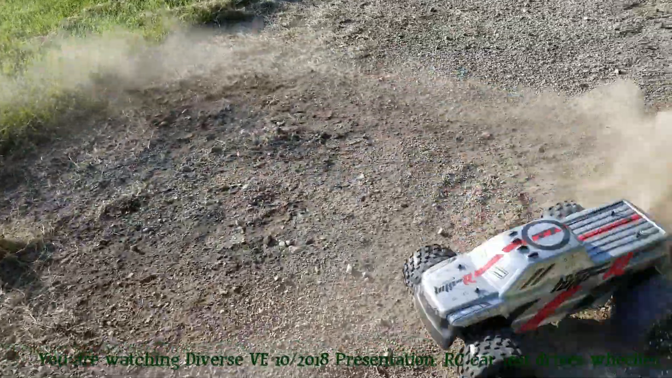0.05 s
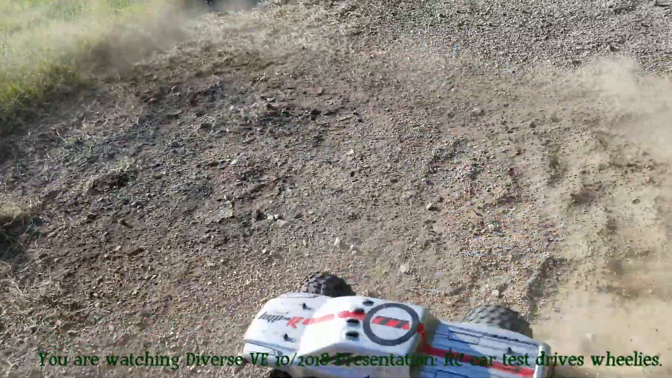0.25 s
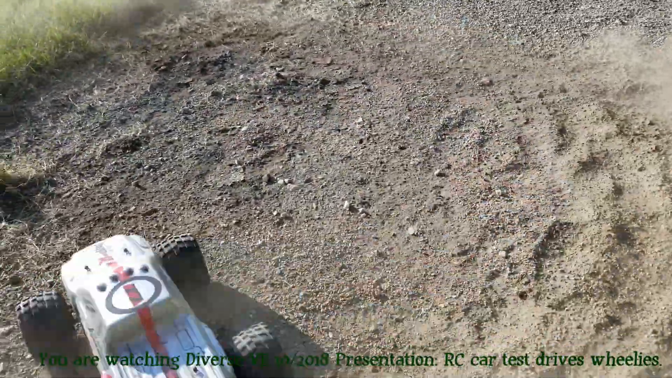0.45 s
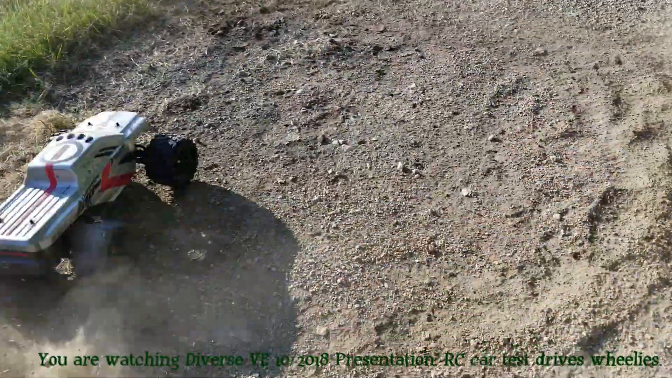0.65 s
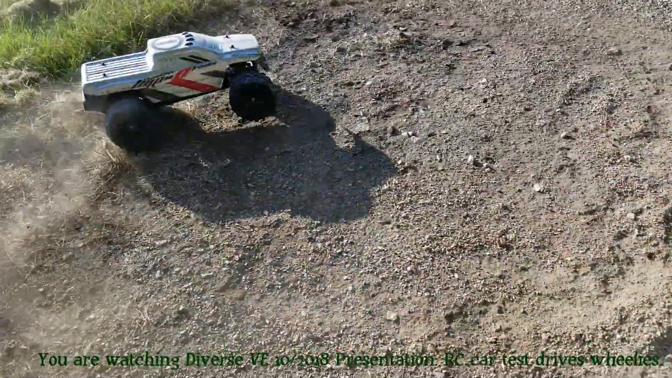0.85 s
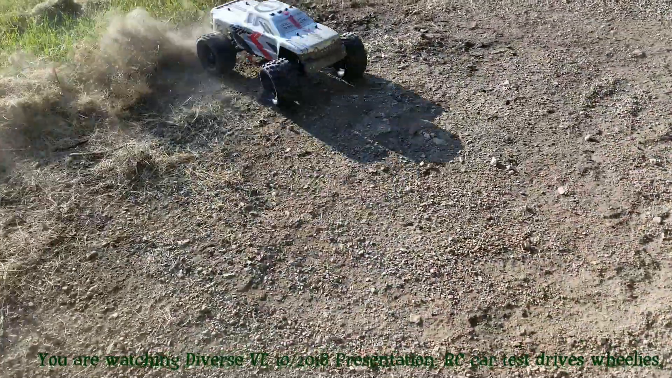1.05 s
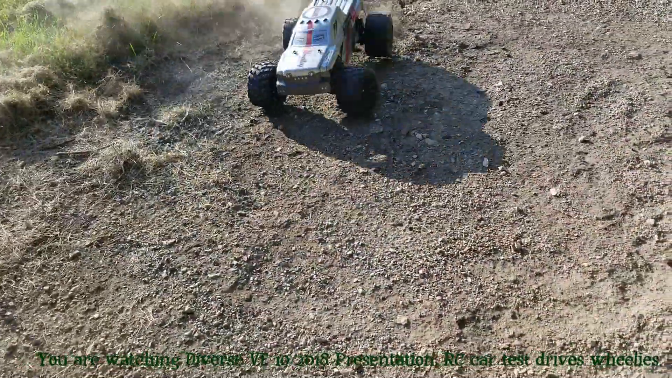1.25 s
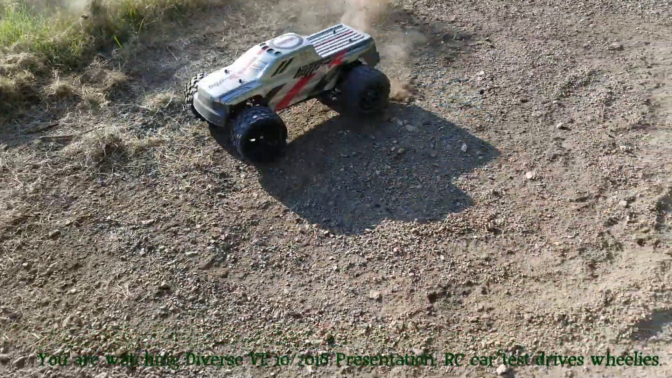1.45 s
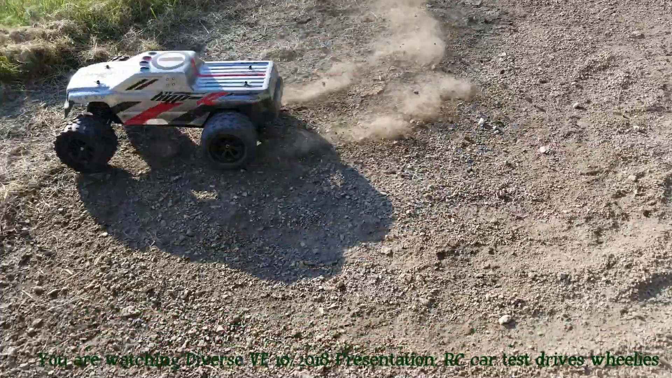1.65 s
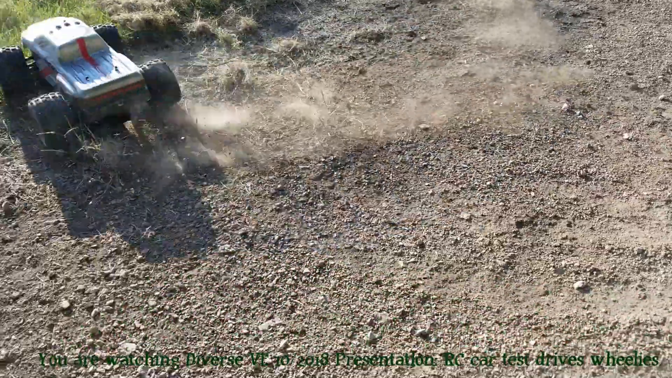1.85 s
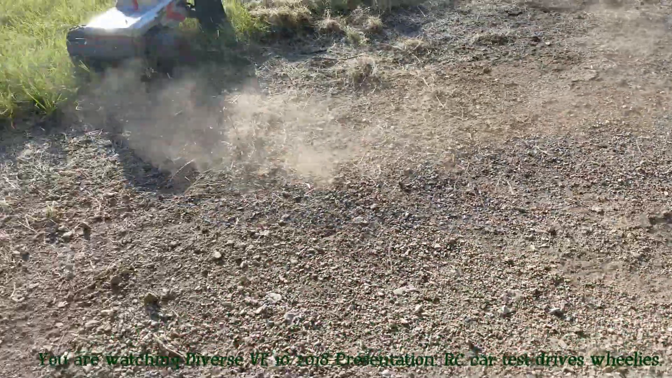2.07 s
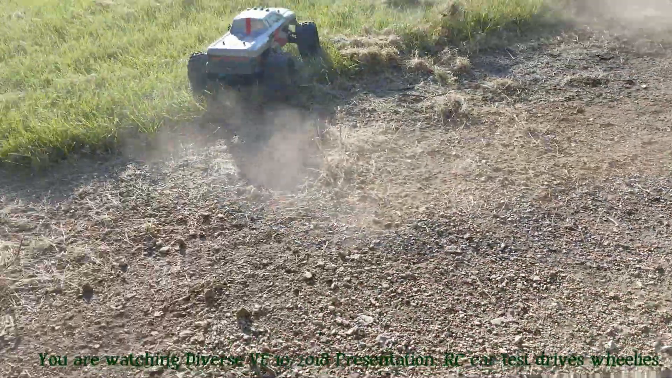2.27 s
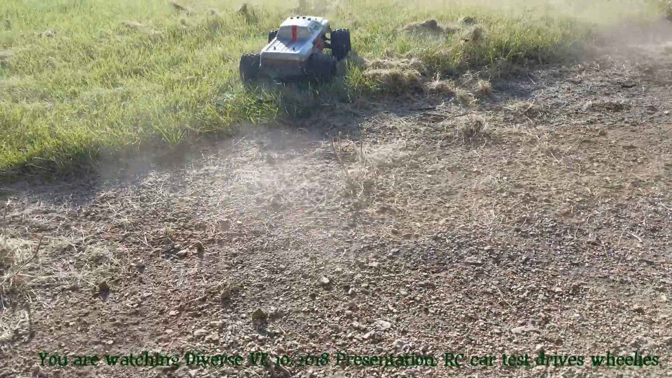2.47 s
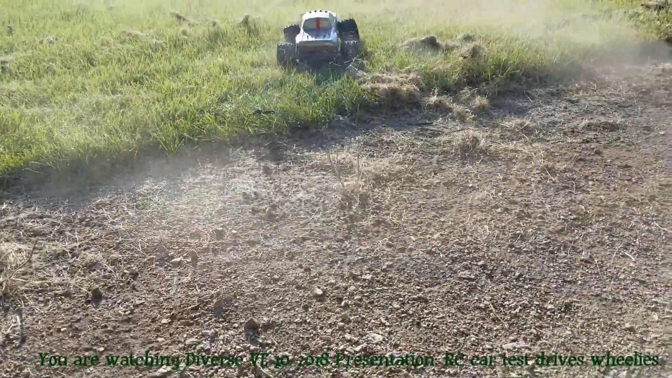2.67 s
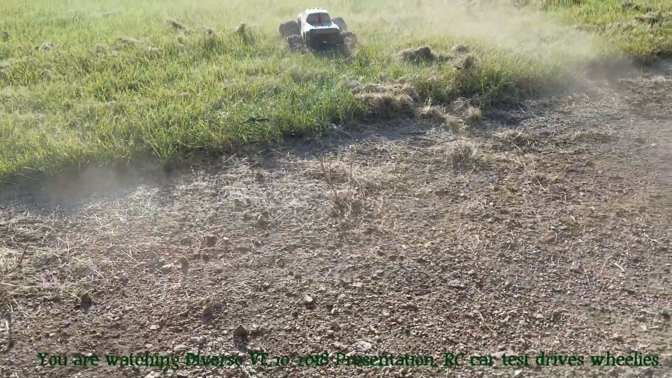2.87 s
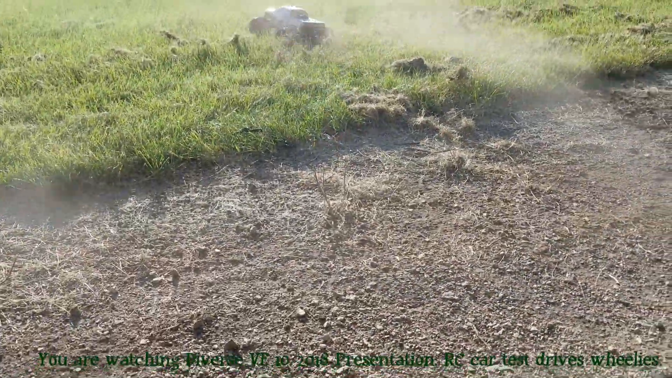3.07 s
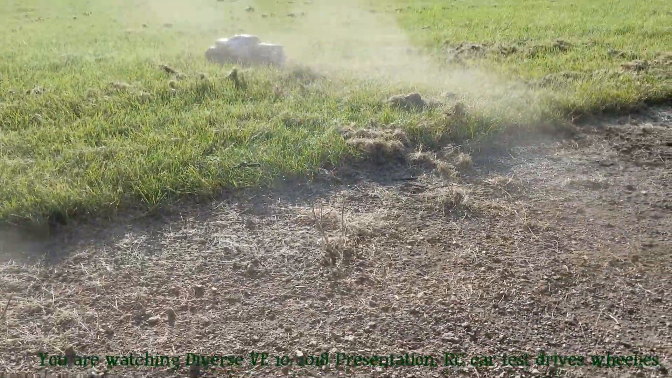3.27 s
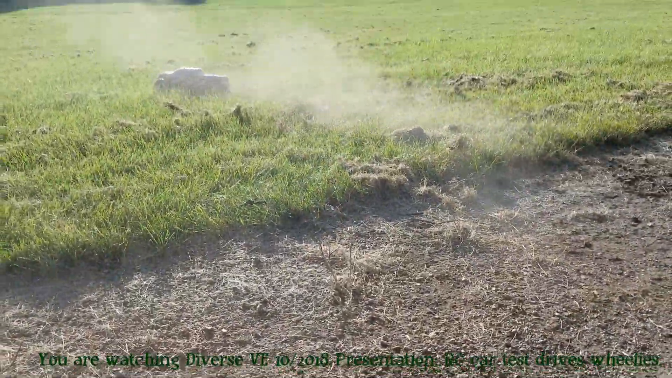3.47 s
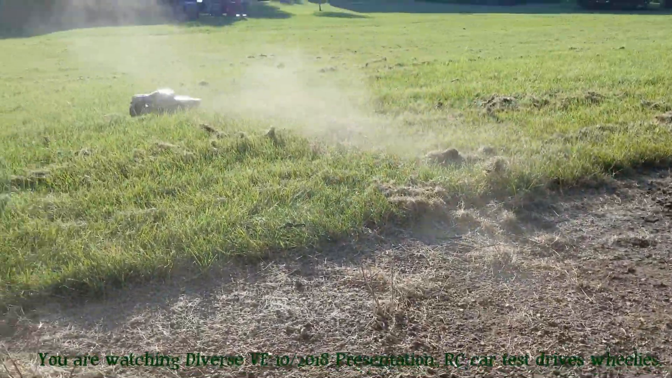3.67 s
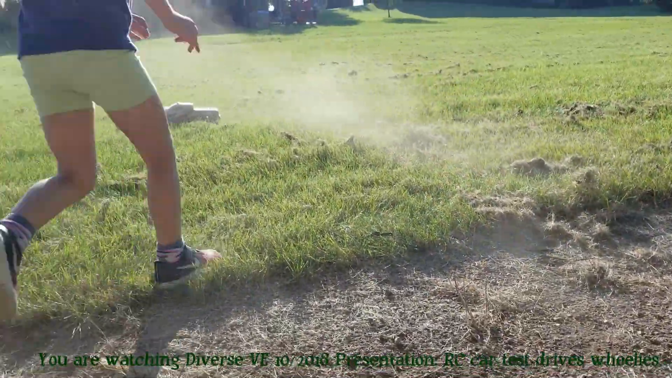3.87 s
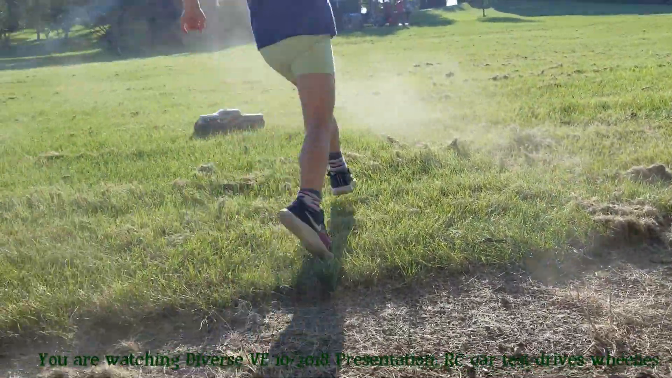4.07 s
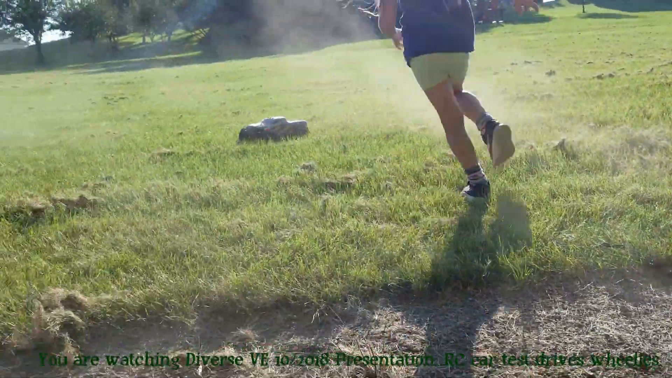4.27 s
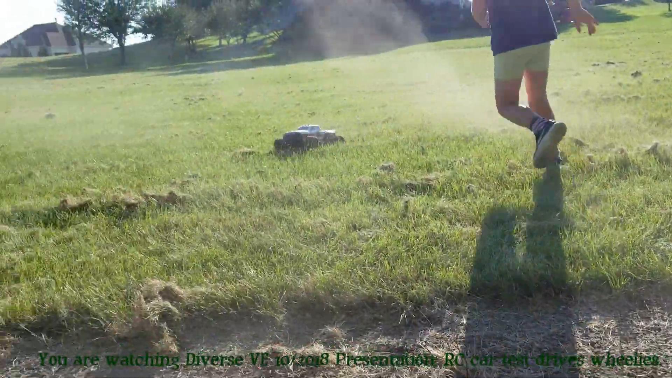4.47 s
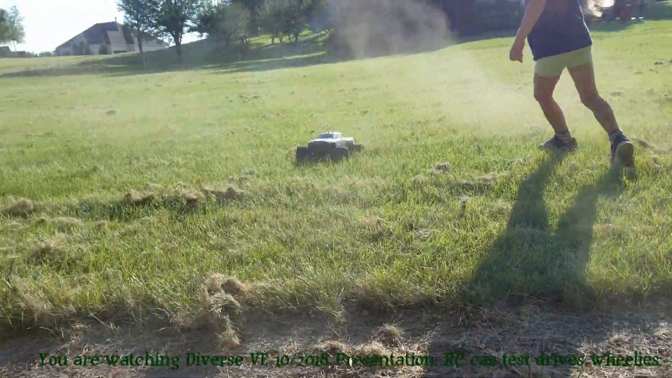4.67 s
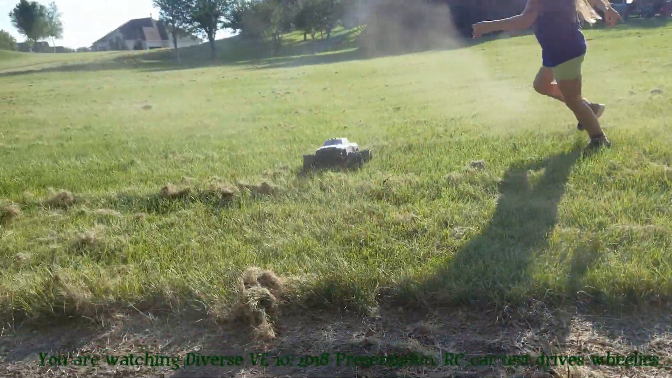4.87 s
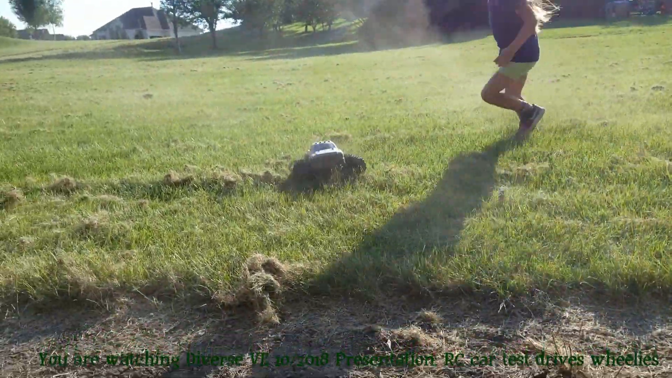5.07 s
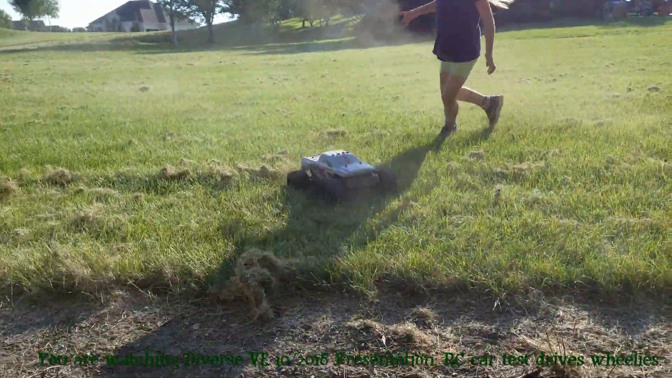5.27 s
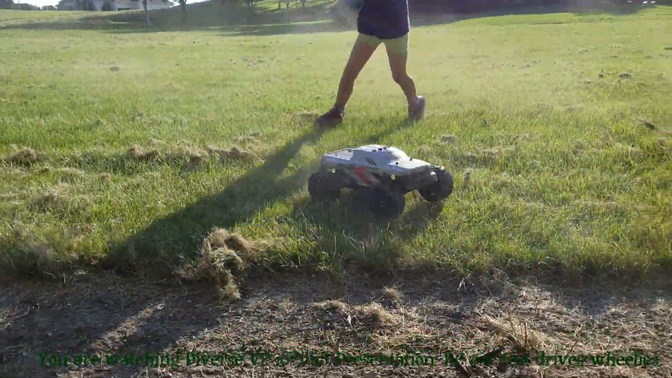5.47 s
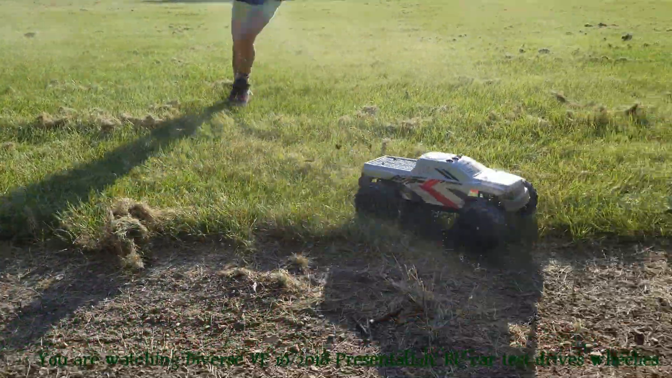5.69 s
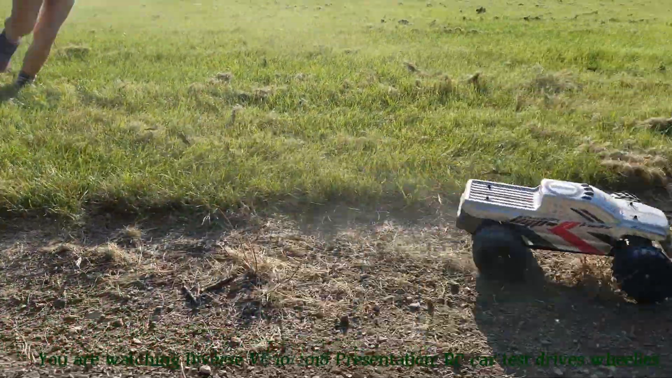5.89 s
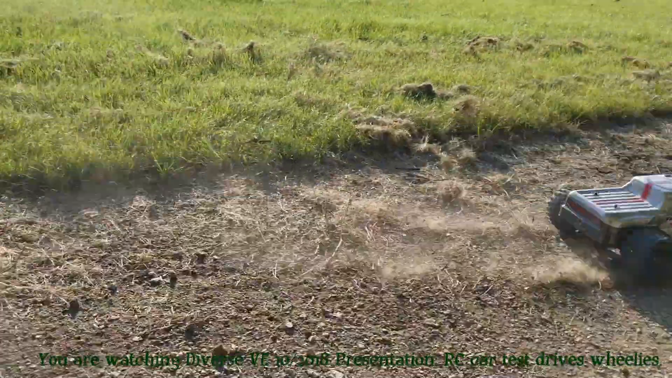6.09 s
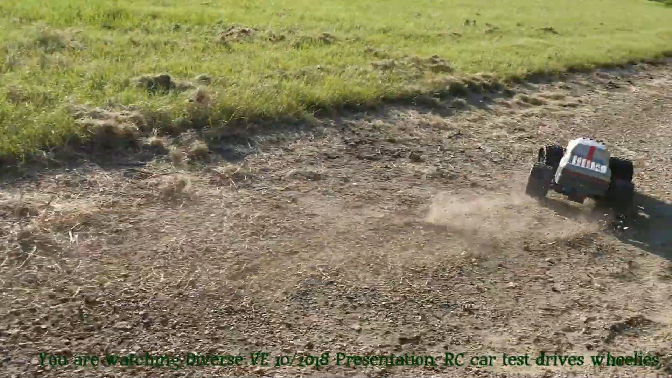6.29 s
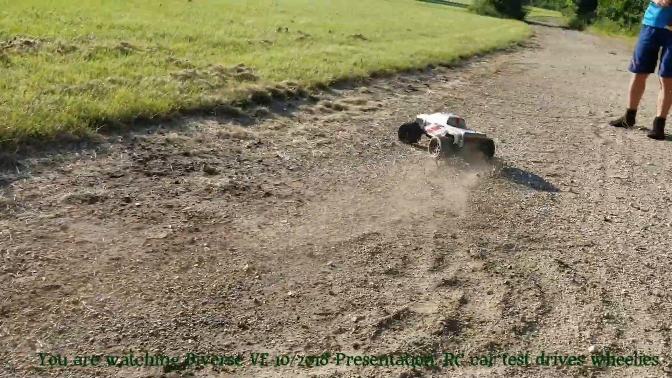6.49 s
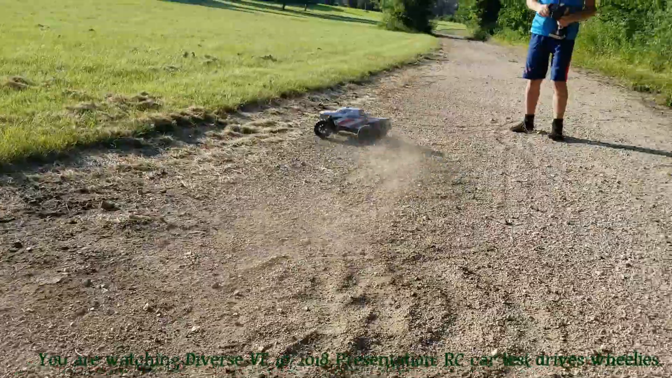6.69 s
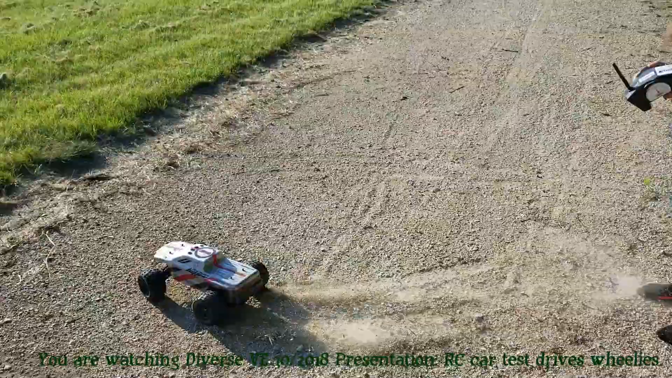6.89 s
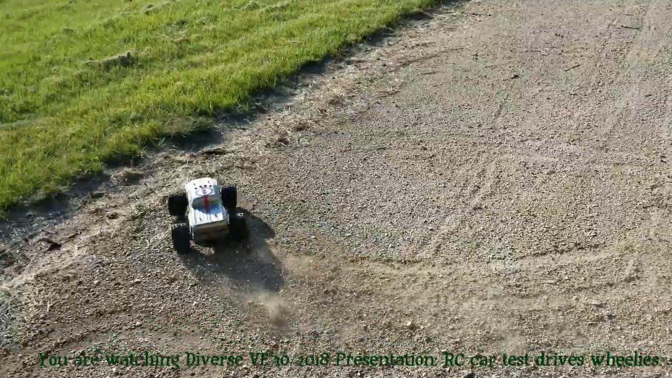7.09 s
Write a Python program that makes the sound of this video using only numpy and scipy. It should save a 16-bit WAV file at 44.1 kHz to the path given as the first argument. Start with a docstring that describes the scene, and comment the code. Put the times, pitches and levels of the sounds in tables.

```python
"""Electric toy truck on gravel and grass

A small truck runs on a gravel track, off over a lawn and back: its gear tones follow a surging motor.
Random blows ring its plastic shell; noise and decaying grains make the tyre crunch, grit and flung stones.
A far engine drones on two wavering sines, air hisses and a runner's feet swish through the grass.
Two microphone ports colour everything differently in level, phase and coherence."""
import sys
import numpy as np
from scipy.fft import rfft, irfft, next_fast_len
from scipy.io import wavfile
from scipy.ndimage import map_coordinates

SR = 44100
rng = np.random.default_rng(int(sys.argv[2]) if len(sys.argv) > 2 else 0)


def put_to_file(sound):
    """Save the sound as 16-bit audio at rate SR, in the file named by the first command-line argument."""
    columns = np.atleast_2d(sound).T  # one column per channel
    safe = np.clip(columns, -1, 1)
    whole_steps = np.round(safe * 32767)
    wavfile.write(sys.argv[1], SR, whole_steps.astype(np.int16))


N = 314874
TOP_HZ = 15950  # band limit

# Ring of the plastic shell: (frequency [Hz], level [dB])
SHELL_SPECTRUM = [(30, -22), (220, -8), (350, -2.5), (455, 5), (590, -2.5), (790, -12), (920, -15),
                  (1500, -18.5), (4000, -75)]
# Tyre crunch: (frequency [Hz], level [dB])
CRUNCH_SPECTRUM = [(300, -7), (850, -1.5), (1500, -3), (2350, 5), (2900, -4), (4100, -1), (5300, 0),
                   (6200, -30), (12000, -9.5)]
# Thrown grit: (frequency [Hz], level [dB])
GRIT_SPECTRUM = [(2000, -19), (3500, -6.5), (5300, -8.5), (7000, -10.5), (10000, 1.5), (11400, -2),
                 (12700, 8), (14000, -9), (16000, -9)]


def amp(db):
    """Decibels to linear amplitude."""
    return 10 ** (np.asarray(db) / 20)


def unit(x):
    """Scale to an RMS of 1 over all rows."""
    return x / np.sqrt(np.mean(x ** 2) + 1e-20)


def along(points, hz):
    """Each column of (Hz, ..) rows, interpolated on a log-frequency axis."""
    f, *cols = np.transpose(points)
    return [np.interp(np.log(hz + 1), np.log(f + 1), c) for c in cols]


def curves(rows):
    """Each column of (s, ..) rows, interpolated to one value per sample."""
    s, *cols = np.transpose(rows)
    return [np.interp(np.arange(N) / SR, s, c) for c in cols]


def wobble(knots_per_s):
    """A smooth random curve through Gaussian knots."""
    knots = rng.standard_normal(int(N * knots_per_s / SR) + 4)
    return map_coordinates(knots, [np.arange(N) * knots_per_s / SR])


def noise():
    """White noise: rows are direct and scattered sound."""
    return rng.standard_normal((2, N))


def swell(centre_s, half_s):
    """A Gaussian rise and fall."""
    return np.exp(-((np.arange(N) / SR - centre_s) / half_s) ** 2)


def coloured(x, spectrum):
    """Minimum-phase filtering: the folded cepstrum makes the given spectrum causal."""
    m = 2 * next_fast_len(x.shape[-1] // 2 + 4096)
    level_db = along(spectrum, np.fft.rfftfreq(m, 1 / SR))[0]
    cepstrum = irfft(np.log(amp(level_db)))
    cepstrum[1:m // 2] *= 2
    cepstrum[m // 2 + 1:] = 0
    response = np.exp(rfft(cepstrum))
    return irfft(rfft(x, m) * response, m)[..., :x.shape[-1]]


def shifted(spectrum, octaves):
    """The same spectrum moved up or down in pitch."""
    return [(hz * 2 ** octaves, db) for hz, db in spectrum]


def gliding(x, spectrum, octaves, count=5):
    """A spectrum sliding in pitch, as a cross-fade of a few fixed filters."""
    steps = np.linspace(octaves.min(), octaves.max(), count)
    out = 0
    for step, share in zip(steps, np.eye(count)):
        out = out + np.interp(octaves, steps, share) * coloured(x, shifted(spectrum, step))
    return out


def impacts(per_s, spread_db, bed):
    """Random single-sample blows of uneven size over a bed of noise."""
    size = amp(spread_db * np.clip(rng.standard_normal(N), -2, 2))
    hit = rng.random(N) < per_s / SR
    blows = hit * size * noise()
    return unit(unit(blows) + bed * noise())


def pebbles(per_s, pitch_hz, cycles, spread_db):
    """Grains click as sines of random pitch that decay within a few cycles."""
    count = int(per_s * N / SR)
    start = rng.integers(0, N, (count, 1))
    tone, size, direct, scattered = rng.standard_normal((count, 4)).T[:, :, None]
    hz = np.minimum(pitch_hz * 2 ** (tone / 2), TOP_HZ)
    age = np.arange(SR // 200)
    turns = hz * age / SR
    grain = amp(spread_db * np.clip(size, -2, 2)) * np.sin(2 * np.pi * turns) * np.exp(-turns / cycles)
    where = (start + age).ravel()
    rows = [np.bincount(where, (grain * gain).ravel(), N)[:N] for gain in (np.sign(direct), scattered)]
    return unit(np.array(rows))


def strikes(events, spectrum, t60_s, rattle):
    """Each blow is a sharp push and a decaying noise rattle, ringing through the struck object's spectrum."""
    out, t = np.zeros((2, N + SR)), np.arange(SR // 5) / SR
    for s, peak_db in events:
        force = rattle * amp(-60 * t / t60_s) * rng.standard_normal((2, len(t)))
        force[:, 0] += 1
        ring = coloured(force, spectrum)
        ring = ring / np.abs(ring).max(axis=1, keepdims=True)
        first = max(round(s * SR), 0)
        out[:, first:first + len(t)] += amp(peak_db) * ring
    return out[:, :N]


def motor():
    """Mesh rate, whine level and surge height: each climbs to a crest, then drops to the next start."""
    # Throttle blips and wheel slips: (start [s], nominal mesh rate at start [Hz], crest [s],
    # nominal mesh rate at crest [Hz], relative whine level at crest [dB])
    surges = [(0, 1850, .035, 2020, -33), (.075, 1850, .115, 2050, -32), (.185, 1750, .234, 2150, -27),
              (.265, 1700, .295, 2000, -23), (.32, 1750, .358, 2150, -30), (.39, 1930, .425, 2110, -31),
              (.53, 1830, .578, 2130, -36), (.645, 1920, .7, 2240, -35), (.737, 1950, .767, 2200, -36.5),
              (.885, 1850, .92, 2130, -40), (1.035, 1450, 1.12, 2250, -41), (1.143, 1750, 1.165, 2160, -35),
              (1.24, 1520, 1.285, 1980, -42), (1.36, 1420, 1.42, 1980, -40), (1.47, 1860, 1.565, 2060, -40),
              (1.6, 1900, 1.638, 2180, -39), (1.71, 1300, 1.75, 1340, -63), (2.2, 650, 2.37, 1130, -55),
              (2.39, 1030, 2.413, 1350, -45), (2.44, 1150, 2.475, 1560, -44),
              (2.525, 1150, 2.55, 1440, -46), (2.578, 1130, 2.694, 2000, -47),
              (2.765, 1200, 2.84, 1680, -50), (2.94, 1700, 2.97, 1830, -47), (3.1, 1490, 3.21, 1800, -52),
              (3.29, 1280, 3.42, 1880, -51), (3.54, 1280, 3.665, 1890, -48), (3.755, 1550, 3.88, 1920, -54),
              (3.98, 1590, 4.29, 1740, -53), (4.385, 1400, 4.495, 2000, -44), (4.61, 1620, 4.69, 1900, -50),
              (4.785, 1460, 4.92, 1950, -46), (5.0, 1390, 5.15, 2210, -43), (5.2, 1300, 5.218, 1520, -48),
              (5.25, 1280, 5.368, 2170, -44), (5.413, 1340, 5.435, 1650, -41),
              (5.47, 1310, 5.52, 1650, -41), (5.545, 1440, 5.61, 1530, -38),
              (5.632, 1460, 5.725, 2260, -38), (5.755, 1700, 5.785, 2120, -41),
              (5.808, 1520, 5.835, 2180, -38), (5.86, 1950, 5.885, 2250, -42),
              (6.04, 2050, 6.29, 2440, -43), (6.625, 2020, 6.65, 2260, -40), (6.72, 2000, 6.785, 2230, -47),
              (6.89, 2150, 6.9, 2200, -35), (7.0, 1970, 7.03, 2330, -36), (7.09, 2020, 7.12, 2300, -40)]
    crest_power = 1.8  # 2 gives a sine, less a broader top
    start_s, low_hz, crest_s, top_hz, top_db = np.transpose(surges)
    turns_s = np.maximum.accumulate(np.column_stack([start_s, crest_s]).ravel())
    # whole numbers are starts, halves are crests
    place = np.interp(np.arange(N) / SR, turns_s, np.arange(len(turns_s))) / 2
    surge = place.astype(int)
    dip = np.minimum(place + .5, len(start_s) - 1).astype(int)
    height = np.abs(np.sin(np.pi * place)) ** crest_power
    low_db = np.minimum(top_db, np.append(top_db[0], top_db[:-1]))
    mesh_hz = low_hz[dip] + (top_hz[surge] - low_hz[dip]) * height
    level_db = low_db[dip] + (top_db[surge] - low_db[dip]) * height
    return mesh_hz, level_db, height


def shaft(phase):
    """Unequal teeth make multiples of the shaft's rate sound faintly, coming and going."""
    teeth, level_db, swing_db = 7, -14, 6  # teeth: mesh beats per shaft turn
    out = 0
    for k in np.arange(teeth - 2, 3 * teeth + 2):
        gain = amp(level_db + swing_db * np.tanh(wobble(20)))
        out = out + gain * np.sin(k / teeth * phase + wobble(60))
    return out


def whine(shaking_db, jitter, shake, hop, flutter_db, grip_db, rough_rad):
    """Gear tones follow the motor and ring the case; stony ground jerks their speed and muffles the dips."""
    # Gear tones: (multiple of the mesh rate, relative level [dB])
    gears = [(1, -10), (2, 0), (3, -15)]
    # Extra level of the mesh tone: (time [s], level [dB])
    mesh_boost = [(5.65, 0), (6, 17), (6.35, 17), (7, 9)]
    # Ring of the gear case: (frequency [Hz], level [dB])
    case = [(900, -5.5), (1350, 1.5), (1800, -6.5), (2250, 2), (3300, 0.5), (4200, 7.5), (5300, 4.5),
            (6000, -14.5)]
    sag_db = 1.8  # scales the softening in the dips
    mesh_hz, level_db, height = motor()
    stony = amp((shaking_db + 36) / 4)
    jerks = shake * wobble(90) + jitter * wobble(500)
    speed_hz = mesh_hz * (1 + hop * wobble(45) + stony * jerks)
    phase = 2 * np.pi * np.cumsum(speed_hz) / SR
    tones = shaft(phase) * np.ones((2, 1))
    for multiple, db in gears:
        grip = unit(amp(grip_db * np.tanh(2 * wobble(85))))  # the teeth grip and let go
        flutter = unit(amp(flutter_db * np.array([wobble(200) for _ in tones])))
        rasp = rough_rad * np.array([wobble(700) for _ in tones])  # uneven teeth smear each line
        drift = np.array([np.zeros(N), wobble(25)])
        gain = amp(db + (multiple == 1) * curves(mesh_boost)[0])
        tones += gain * grip * flutter * np.sin(multiple * phase + rasp + drift)
    sag = sag_db * stony ** 2 * (1.5 - height)
    return amp(level_db + 4 - sag) * coloured(tones, case)


def shell_flex():
    """Pitch shift of the shell's ring in octaves: it wanders as the shell flexes."""
    # Slow shift: (time [s], pitch shift [octaves])
    slow_shift = [(.25, 0), (.6, -0.093), (1.6, -0.042), (7.1, -0.014)]
    flex_octaves, knots_per_s = .09, 20
    return curves(slow_shift)[0] + flex_octaves * np.tanh(wobble(knots_per_s))


def drumming(shaking_db, flex):
    """Tyre lugs and pebbles shake the plastic shell with dense random blows."""
    jolts = amp(3.5 * np.tanh(wobble(55)))
    ring = gliding(impacts(per_s=700, spread_db=2.5, bed=0.81), SHELL_SPECTRUM, flex)
    return amp(shaking_db - 2.5) * unit(jolts * ring)


def crunch(bites):
    """The tyres grind the ground in uneven bites: noise with clumps of grains."""
    # Pitch of the crunch: (time [s], pitch shift [octaves])
    pitch_shift = [(1, 0.05), (5.7, -0.073)]
    grains = pebbles(per_s=1100, pitch_hz=1400, cycles=3, spread_db=4)
    clumps = unit(amp(4 * np.tanh(wobble(70))) * grains)
    grinding = noise() + .6 * clumps
    return unit(amp(3.15 * bites) * gliding(grinding, CRUNCH_SPECTRUM, curves(pitch_shift)[0]))


def grit(bites):
    """The tyres throw dust and chips: noise and high-pitched grains, following the bites."""
    chips = pebbles(per_s=600, pitch_hz=9000, cycles=2.5, spread_db=6)
    dust = noise() + 0.51 * chips
    return unit(amp(1.8 * bites + 1.4 * wobble(110)) * coloured(dust, GRIT_SPECTRUM))


def swish():
    """Grass brushes the tyres: coloured noise, slowly uneven."""
    # Grass noise: (frequency [Hz], level [dB])
    grass_spectrum = [(2200, -17.5), (3600, -4), (5200, -1.5), (6400, -11.5), (16000, -15.5)]
    return unit(amp(1.9 * wobble(30)) * coloured(noise(), grass_spectrum))


def tyre_gains(shaking_db):
    """Crunch follows the shaking, spray its own curve; each skid adds power to both."""
    # Spray behind the wheels: (time [s], level [dB])
    spray_level = [(0, -32.5), (.3, -37.5), (1.6, -49.5), (2.05, -54.5), (3.4, -44), (3.8, -48), (5.5, -42),
                   (5.9, -37.5), (6.5, -37.5), (7.14, -42.5)]
    # Tyres skid and dig in: (centre [s], half length [s], crunch level [dB], spray level [dB])
    skids = [(0.23, 0.098, -28.5, -34), (0.815, 0.072, -33.5, -39.5), (1.64, 0.049, -40, -41.5),
             (1.903, 0.025, -35, -63), (6.373, 0.15, -35, -47)]
    crunch_db, crunch_db_per_db = -16.5, 0.7  # level at 0 dB shaking; slope
    crunch_gain = amp(crunch_db + crunch_db_per_db * shaking_db)
    spray_gain = amp(curves(spray_level)[0])
    for s, half_s, skid_crunch_db, skid_spray_db in skids:
        slip = swell(s, half_s)
        crunch_gain = np.hypot(crunch_gain, amp(skid_crunch_db) * slip)
        spray_gain = np.hypot(spray_gain, amp(skid_spray_db) * slip)
    return crunch_gain, spray_gain


def tyres(shaking_db):
    """The tyres crunch the ground and spray grit on the track or swish on the lawn."""
    # Ground under the tyres: (time [s], share of grass [0-1])
    lawn = [(1.6, 0), (2, 0.92), (4.8, 0.9), (5.6, 0.45)]
    bites = np.tanh(wobble(45))
    grass = np.clip(curves(lawn)[0], 0, 1)
    spray = np.sqrt(1 - grass) * grit(bites) + 0.82 * np.sqrt(grass) * swish()
    crunch_gain, spray_gain = tyre_gains(shaking_db)
    return crunch_gain * crunch(bites) + spray_gain * spray


def open_air():
    """A soft steady hiss of coloured noise."""
    # Air noise: (frequency [Hz], level [dB])
    air_spectrum = [(30, -10.5), (70, 4.5), (200, -10), (450, -8.5), (900, -26.5), (2700, -39), (4900, -7),
                    (6900, -37), (13000, -16)]
    return amp(-51.0) * unit(coloured(noise(), air_spectrum))


def far_engine():
    """Sines on one wavering clock drone together, in the direct row only."""
    # Engine tones: (nominal frequency [Hz], relative level [dB])
    drone_tones = [(79, 1), (118, -9)]
    # Engine level: (time [s], level [dB])
    drone_level = [(0, -55), (2.4, -58), (3.2, -43), (7.1, -45.5)]
    clock_s = np.cumsum(1 + 0.0085 * wobble(6.65)) / SR
    drone = unit(sum(amp(db) * np.sin(2 * np.pi * hz * clock_s) for hz, db in drone_tones))
    return amp(curves(drone_level)[0]) * np.array([drone, np.zeros(N)])


def stones():
    """Stones flung against the chassis: short bright strikes."""
    # Stone hits: (time [s], peak level ahead of the ports [dB])
    hits = [(.029, -17.5), (.195, -10.5), (.222, -10.5), (.648, -21), (.779, -13), (2.369, -32.5),
            (5.539, -12.5), (6.464, -23)]
    return strikes(hits, GRIT_SPECTRUM, t60_s=.018, rattle=.45)


def bumps(flex):
    """Larger bumps jolt the shell, each ringing at the pitch it has flexed to."""
    # Bumps: (time [s], peak level ahead of the ports [dB])
    jolts = [(0.131, -18), (0.255, -13), (0.344, -14), (.598, -15), (.929, -18), (1.51, -13),
             (1.615, -12.5), (1.719, -18.5), (2.492, -24.5), (5.711, -15.5), (5.775, -19), (5.88, -13),
             (6.021, -14.5), (6.061, -18), (6.196, -17), (6.458, -18), (6.906, -13.5), (6.961, -15)]
    out = 0
    for s, db in jolts:
        out = out + strikes([(s, db)], shifted(SHELL_SPECTRUM, flex[int(s * SR)]), t60_s=0.07, rattle=0.16)
    return out


def clacks():
    """The suspension clacks: brief rattling strikes in the crunch's colour."""
    # Clacks: (time [s], peak level ahead of the ports [dB])
    hits = [(1.324, -21), (2.26, -24), (3.303, -27.5), (4.395, -26.5), (6.793, -26), (6.897, -32)]
    return strikes(hits, CRUNCH_SPECTRUM, t60_s=0.016, rattle=0.7)


def landings():
    """The wheels land on turf with low thuds."""
    # Landings: (time [s], peak level ahead of the ports [dB])
    hits = [(2.521, -22.5), (2.545, -26.5), (2.632, -34)]
    # Turf thud: (frequency [Hz], level [dB])
    turf = [(100, -36), (240, -3), (305, 14), (400, -0.5), (1600, -31)]
    return strikes(hits, turf, t60_s=0.1, rattle=0.07)


def footsteps():
    """A runner's steps each crush a swelling patch of dry blades."""
    # Steps: (centre [s], level [dB], half length [s])
    steps = [(4.082, -42, 0.17), (4.183, -39.5, 0.036)]
    pressure = sum(amp(db) * swell(s, half_s) for s, db, half_s in steps)
    spectrum = [(100, 0.5), (5000, -4.0), (7000, -16.5)]  # (frequency [Hz], level [dB])
    blades = coloured(impacts(per_s=1500, spread_db=7.0, bed=0.9), spectrum)
    return pressure * unit(blades)


def ports(pair):
    """Direct and scattered sound reach two ports that differ in level and phase at each frequency."""
    # Ports: (frequency [Hz], left-right level [dB], phase lead of the left [rad], coherence [0-1])
    port_table = [(148, 1, 0, 0.9), (535, -3, 0.36, 0.42), (830, 1, -1.5, 0.2), (2140, -9, -2.5, 0.64),
                  (3180, -2.5, -3, 0.18), (3730, -9.5, -5, 0.65), (5510, -8.5, -2, 0.58),
                  (6260, 15, -2, 0.65), (12800, -5.5, -2.5, 0.077), (15000, 0, -2.5, .3)]
    m = next_fast_len(N + SR // 2)
    balance_db, lead_rad, coherence = along(port_table, np.fft.rfftfreq(m, 1 / SR))
    coherence = np.clip(coherence, 0, .99)
    shares = np.sqrt([(1 + coherence) / 2, (1 - coherence) / 2])
    direct, scattered = rfft(pair, m) * shares
    tilt = amp(balance_db / 2) * np.exp(.5j * lead_rad)
    # level of the ports' mean, divided out
    centre = np.sqrt(amp(balance_db) + amp(-balance_db) + 2 * coherence * np.cos(lead_rad)) / 2
    left, right = (direct + scattered) * tilt, (direct - scattered) / tilt
    return irfft(np.array([left, right]) / centre, m)[:, :N]


def scene():
    """The panned truck, the runner and the open field, heard through the ports."""
    # How hard the ground shakes the truck: (time [s], shaking [dB])
    shaking = [(0, -23.5), (.26, -15), (.68, -30), (1.3, -25), (1.62, -24), (1.78, -35), (1.93, -31.5),
               (2.02, -60.5), (2.35, -46.5), (3.6, -58), (5, -50), (5.55, -36.5), (5.75, -27), (6.05, -23),
               (6.6, -25.5), (6.88, -34.5), (6.905, -24), (7.14, -28)]
    # Place of the truck: (time [s], left-right level [dB])
    pan = [(0, -5), (1.2, 1), (2.6, 0.5), (7.1, -0.1)]
    shaking_db, = curves(shaking)
    pan_db, = curves(pan)
    flex = shell_flex()
    gears = whine(shaking_db, jitter=0.003, shake=.008, hop=.014, flutter_db=2.5, grip_db=5, rough_rad=0.34)
    body = drumming(shaking_db, flex) + bumps(flex) + landings()
    ground = tyres(shaking_db) + stones() + clacks()
    truck = ports(gears + body + ground)
    field = ports(open_air() + far_engine() + footsteps())
    return truck * amp([pan_db / 2, -pan_db / 2]) + field


def record(dry):
    """Round off the loudest peaks, then cut everything from the band limit up."""
    rounded = dry / (1 + (dry / .9) ** 4) ** .25
    m = next_fast_len(N + SR // 2)
    passed = np.fft.rfftfreq(m, 1 / SR) < TOP_HZ
    return irfft(rfft(rounded, m) * passed, m)[:, :N]


dry = scene()
out = record(dry)
put_to_file(out)
```